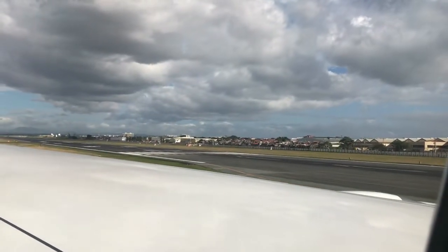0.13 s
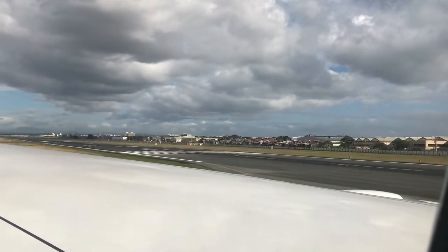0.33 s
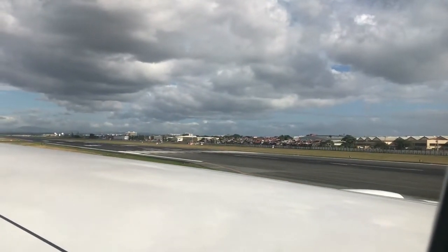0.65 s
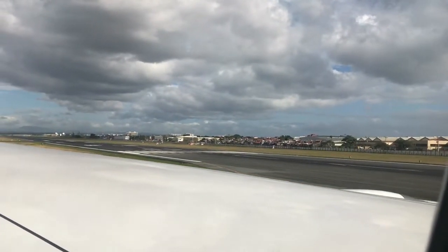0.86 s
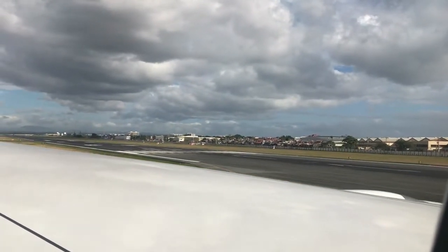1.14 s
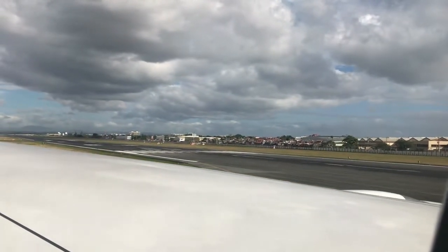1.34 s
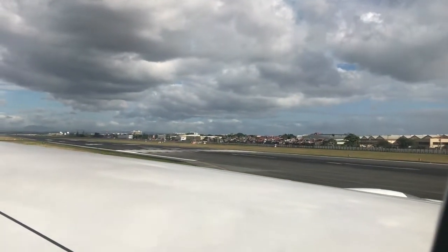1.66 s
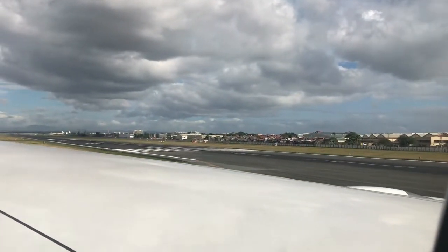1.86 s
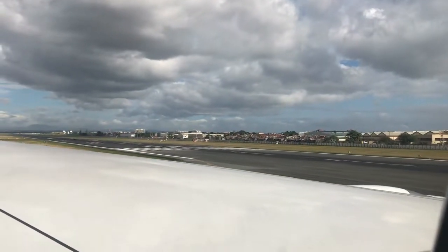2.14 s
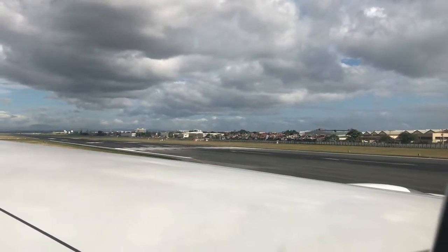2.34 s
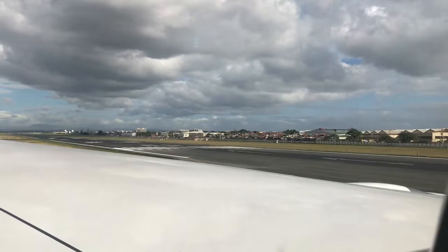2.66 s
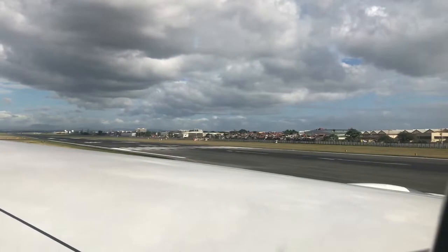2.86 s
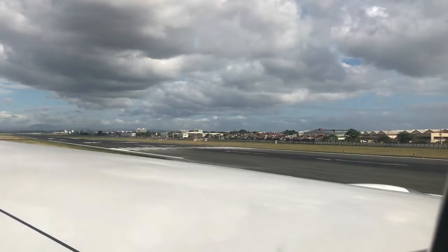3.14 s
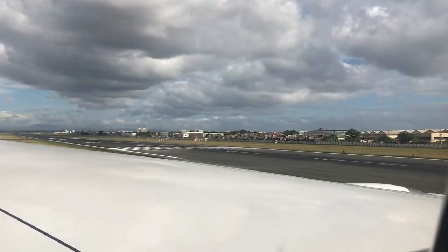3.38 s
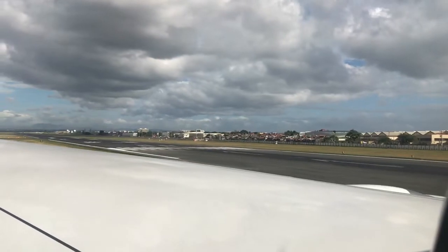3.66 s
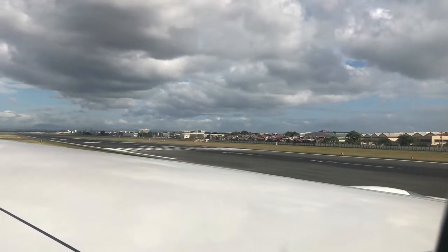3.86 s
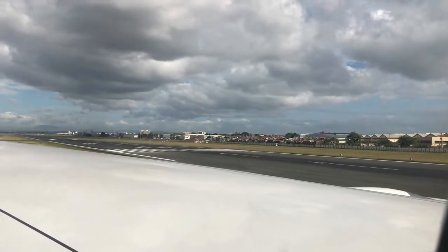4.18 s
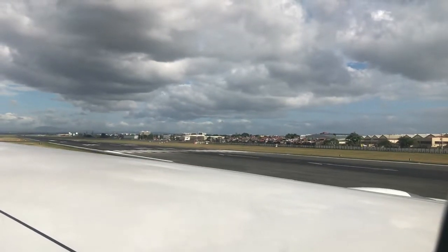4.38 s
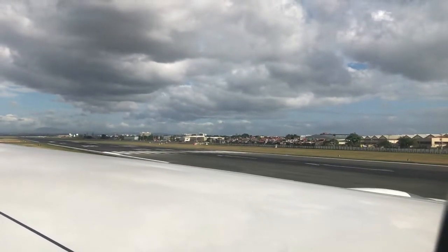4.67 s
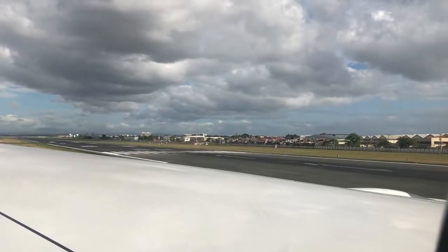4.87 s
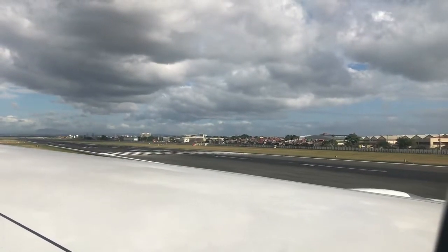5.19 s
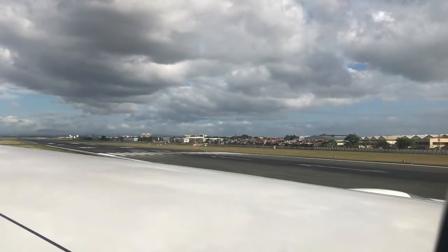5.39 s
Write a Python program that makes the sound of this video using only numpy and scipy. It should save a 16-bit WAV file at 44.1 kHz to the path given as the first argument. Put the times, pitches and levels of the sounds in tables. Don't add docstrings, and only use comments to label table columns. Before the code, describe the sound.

The inside of a jet airliner cabin as it taxis, captured by a handheld phone. From about 0.1 to 0.8 seconds the wheels cross uneven paving joints: rapid, very deep floor booms, strongest near 0.35, 0.55 and 0.66 seconds, with hard plastic rattles around 0.1 and a sharp clack near 0.75. Smaller rattling settles by 1 second. From then on a continuous, muffled low rumble swells gently beneath soft, airy vent hiss. A faint, thin engine whine glides upward slightly, mainly between 1 and 5 seconds, joined by a growing low hum; a second, nearly matching whine makes it beat slowly from about 3.5 seconds. Light trim ticks come sparsely near 1.7, 2.2, 2.4, 3.05, 3.3 and 4 seconds, the ones at 2.4 and 4.0 clearest. The last second is just rumble, hiss and whine, without a fade. The enclosed cabin adds only a very short tail.

```python
import sys
import numpy as np
from scipy import signal
from scipy.fft import rfft, irfft
from scipy.io import wavfile
from scipy.ndimage import uniform_filter1d

SR = 44100
rng = np.random.default_rng(int(sys.argv[2]) if len(sys.argv) > 2 else 0)


def wav_record(signal):
    frames = np.transpose(np.atleast_2d(signal))
    bounded = np.clip(frames, -1, 1)
    quanta = np.round(bounded * 32767).astype(np.int16)
    wavfile.write(sys.argv[1], SR, quanta)


def rack_gain(trim_db):
    fader = np.asarray(trim_db, float)
    return 10 ** (fader / 20)


N = 243431


def curves(table):
    s, *columns = np.transpose(table)
    return [np.interp(np.arange(N) / SR, s, c) for c in columns]


def resonate(x, points, peaks=()):
    hz = np.arange(len(x) // 2 + 1) * SR / len(x) + 1
    point_hz, point_db = np.array(points).T
    db = np.interp(np.log(hz), np.log(point_hz), point_db)
    for centre, width, boost in peaks:
        db = db + boost / (1 + (2 * (hz - centre) / width) ** 2)
    cepstrum = irfft(db * np.log(10) / 20, len(x))
    cepstrum[1:len(x) // 2] *= 2
    cepstrum[len(x) // 2 + 1:] = 0
    return irfft(rfft(x) * np.exp(rfft(cepstrum)), len(x))


def colour(x, points, peaks=()):
    y = resonate(x, points, peaks)
    return y / y.std()


def walk(rate):
    hold = int(SR / rate)
    steps = np.repeat(rng.standard_normal(N // hold + 1), hold)
    return 1.13 * uniform_filter1d(uniform_filter1d(steps, hold), hold)[:N]


def tone(hz, db, turns=0):
    return np.sqrt(2) * rack_gain(db) * np.sin(2 * np.pi * (np.cumsum(hz) / SR + turns))


def add(out, x, s):
    i = int(s * SR)
    out[i:i + len(x)] += x[:N - i]


# frequency in Hz, density in dB per Hz.
RUMBLE_SPECTRUM = [(12, -64.5), (22, -22), (33, -33.5), (40, -2), (60, 1), (91, -0.5), (113, -4), (179, -7),
                   (209, -14.5), (317, -21), (425, -31.5), (527, -38.5), (686, -39), (1040, -74)]
# time in seconds, level in dB.
PAVING = [(0, -31), (.12, -11), (.26, -32), (.35, -18), (.53, -17), (.62, -11.5), (.85, -25), (1.15, -25),
          (1.35, -20.5), (1.7, -32.5), (1.9, -25), (2.3, -29.5), (2.9, -23.5), (3.4, -26.5), (4.1, -26),
          (4.7, -29.5), (5.1, -25), (5.52, -24.5)]
# time in seconds, level in dB.
ROAR = [(0, -27.5), (.35, -28), (.6, -38.5), (.95, -25), (1.35, -28.5), (1.75, -24.5), (2.9, -26),
        (3.5, -27), (4.4, -26), (5.52, -28)]


def hull():
    wheels_db, = curves(PAVING)
    roar_db, = curves(ROAR)
    shake = colour(rng.standard_normal(N), RUMBLE_SPECTRUM)
    wheels = signal.sosfiltfilt(signal.butter(2, 110, fs=SR, output="sos"), shake)
    low = signal.sosfiltfilt(signal.butter(2, 215, fs=SR, output="sos"), shake)
    boom, skin = low - wheels, shake - low
    parts = [(wheels, wheels_db), (skin, -37 + 0.19 * walk(3.3)), (boom, roar_db + 0.26 * walk(7.5))]
    return sum(x / x.std() * rack_gain(db) for x, db in parts)


# start in seconds, peak level in dB, floor resonance in Hz, rise in ms.
JOINTS = [(0.096, -6.5, 76.7, 21), (0.144, -10, 81.4, 17.4), (0.2, -14, 64.3, 33),
          (0.291, -8.5, 99.2, 18.5), (0.346, 0, 66.7, 9.9), (0.384, -11, 80.4, 17.6),
          (0.45, -15.5, 60.5, 22), (0.511, -12, 60, 8.5), (0.553, -2, 66.6, 9.8), (0.589, -11, 89, 13),
          (0.614, -22, 60.5, 15), (0.661, 0, 71.9, 18), (0.727, -11, 76.6, 17.5), (0.753, -21, 74, 10)]


def jolts():
    out, t = np.zeros(N), np.arange(SR // 4) / SR
    crunch = colour(rng.standard_normal(N), [(200, -13.5), (400, 1.5), (1000, -1), (1800, -31.5)])
    for s, db, hz, rise_ms in JOINTS:
        u = t / (rise_ms / 1000)
        swell = (u * np.exp(1 - u)) ** 1.47
        floor = np.sin(2 * np.pi * hz * t)
        panels = rack_gain(-38.5) * crunch[int(s * SR):][:len(t)]
        add(out, rack_gain(db) * swell * (floor + panels), s)
    return out


# time in seconds, near engine in Hz, far engine slower by Hz.
SPOOL = [(0, 900.5, 6.0), (.6, 901.2, 6.0), (1.2, 904.6, 6.0), (2, 911.6, 6.1), (2.8, 918.9, 6.2),
         (3.5, 924.1, 6.0), (3.9, 927.5, 5.3), (4.1, 929, 5.05), (4.6, 932.1, 4.3), (5.1, 935.2, 3.5),
         (5.52, 936.8, 3.1)]
# frequency at idle in Hz, rise while spooling up in Hz.
GEARED = [
    (84.1, 6),
    (493.5, 11),
    (963.9, 43.3),
    (1558.3, 55),
    (9008.7, 0),
]
# level at idle in dB, level spooled up in dB.
GEARED_LEVELS = [(-60, -27), (-80, -61), (-63, -68), (-61.5, -57.5), (-81, -86)]


def engines():
    near_hz, slower_hz = curves(SPOOL)
    spool = (near_hz - near_hz[0]) / 37.5

    def fade(idle, spooled):
        return idle + (spooled - idle) * spool

    joins_s, rise_s, beat_null_s = 3.5, .35, 4.5
    far_db = -53 - 20 * np.log10(1 + np.exp((joins_s - np.arange(N) / SR) / rise_s))
    slip = np.cumsum(slower_hz)[int(beat_null_s * SR)] / SR
    out = tone(near_hz, fade(-49, -53.5) + 1.0 * walk(12))
    out -= tone(near_hz - slower_hz, far_db, slip)
    out += tone(near_hz / 2, fade(-53.5, -59) + 1.6 * walk(6.1))
    for (idle_hz, gain_hz), ends_db in zip(GEARED, GEARED_LEVELS):
        sway_db = 2.5 if idle_hz < 200 else 1.4
        out += fade(*rack_gain(ends_db)) * tone(idle_hz + gain_hz * spool, sway_db * walk(7.9))
    return out


# start in seconds, level in dB, body and brightness in dB over it.
RATTLES = [(.0633, -42, -5, -8), (.0700, -37, -1, -5), (.0737, -31, -2, -10), (.0878, -36, 4, -11),
           (.0974, -37.5, 4, -12), (.1234, -39.5, -0.5, -12), (.152, -50.5, 11, -2), (.3468, -49.5, 6, -10),
           (.3681, -49, -5, -13), (.394, -50.5, 1, -5), (.637, -47, 3, 3), (.6544, -48.5, 7, -1),
           (.6734, -46.5, 7, 1), (.6834, -50, 3, 7), (.6994, -51, 4, 1), (.7488, -25, -2.5, -12.5),
           (.7766, -31, -4, -15), (.7944, -51, 11, -6), (.8186, -47, 4, -6), (.846, -51, -3, -5),
           (.9123, -38, -2.5, -14.5), (.9577, -44, 1, -12), (.9794, -56, 7, 3)]
# start in seconds, level in dB, body and brightness in dB over it.
TICKS = [(1.6916, -46, 3, -8), (1.7215, -48, 5, -17), (2.161, -44, 2, -2), (2.178, -48, 3, -3),
         (2.2833, -61, 10, 6), (2.381, -35.5, 1, -14.5), (2.4342, -49, 2, -8), (2.5247, -52.5, 4, -0.5),
         (3.0395, -45, 1, -14), (3.064, -50, 0, -8), (3.075, -49.5, -4, -7), (3.2046, -54, 5, -10),
         (3.2803, -43.5, -1, -9), (3.293, -44, 1, -26), (3.9464, -55, 8, 4), (3.9974, -52, 3, -3),
         (4.0178, -37, -1, -14), (4.0314, -57, 17, 1), (4.0554, -54, 3, -2), (3.9555, -55, 8, 3)]


def blows():
    return [(s, db, db + body, db + bright, db + bright + top_db)
            for rows, top_db in ((RATTLES, -11.5), (TICKS, -14)) for s, db, body, bright in rows]


# frequency in Hz, width in Hz, boost in dB.
TRIM = [(1500, 110, 11), (1820, 80, 8), (2090, 90, 8), (2410, 120, 4), (2780, 120, 7), (3710, 300, 16),
        (4210, 120, 6), (4830, 150, 3), (5300, 200, 7), (5930, 250, 9), (7300, 250, 8), (8100, 200, 5),
        (9200, 250, 4), (11800, 400, 6), (12700, 300, 5), (14200, 300, 3)]


def rattles():
    out, t = np.zeros(N), np.arange(8192) / SR
    cabin_t60_s, cabin_db = .11, -12
    for s, mid_db, low_db, high_db, top_db in blows():
        buzz_ms = 2.1 + .05 * (mid_db + 53.5)
        place, contact = rng.standard_normal(len(TRIM)), rng.standard_normal((2, len(t)))
        shape = [(1250, low_db - 7), (1450, low_db + 7), (2700, low_db + 5.0),
                 (3300, mid_db - 8.0), (4600, mid_db - 5.5), (5400, high_db + 3.5),
                 (8500, high_db + 1), (10300, top_db), (16000, top_db + 3.5)]
        spot = 1 + .12 * place
        woken = [(hz, 1.44 * width, 1.165 * db * p) for (hz, width, db), p in zip(TRIM, spot)]
        buzz = contact[0] * (1 - np.exp(-t / 0.0007)) * np.exp(-(t / (max(buzz_ms, .5) / 550)) ** 2)
        snap = 2.2 * (t == t[20])
        blow = rfft(buzz + snap)
        power = np.abs(blow) ** 2
        even = np.sqrt(np.mean(power) / uniform_filter1d(power, size=24))
        push = irfft(blow * even) * (t < .05)
        decay = np.exp(-np.log(1000) * t / cabin_t60_s)
        tail = rack_gain(cabin_db) * contact[1] * (1 - np.exp(-t / 0.0051)) * decay
        add(out, resonate(push + tail, shape, woken), s)
    return out


# peak in seconds, level in dB, half length in seconds,
# sizzle in dB over it.
STIRS = [
    (0.092, -52.5, 0.023, -14),
    (0.41, -57, 0.043, -20),
    (0.665, -58, 0.066, -18),
    (0.96, -58.5, 0.08, -7),
    (1.197, -62.5, 0.11, -11),
    (1.65, -64, 0.057, -9),
    (2.68, -64, .1, -8),
    (3.2, -67, 0.1, -9),
    (3.568, -65, .05, -6),
    (4.02, -61, .07, -16),
]


def unrest():
    t = np.arange(N) / SR
    after_db, after_t60_s = -18, 0.26
    after = sum((t > s) * rack_gain(db + after_db - 60 * np.maximum(t - s, 0) / after_t60_s) ** 2
                for s, db, *_ in blows())
    wash = after + rack_gain(-76.5) ** 2
    sizzle = after * rack_gain(-19) ** 2 + rack_gain(-82) ** 2
    for s, db, half_s, sizzle_db in STIRS:
        swell = rack_gain(db) ** 2 * np.exp(-((t - s) / half_s) ** 2)
        wash = wash + swell
        sizzle = sizzle + swell * rack_gain(sizzle_db) ** 2
    return np.sqrt(wash), np.sqrt(sizzle)


def chatter():
    wash_gain, sizzle_gain = unrest()
    size_db = 1.5 * uniform_filter1d(rng.standard_normal((2, N)), size=60) * 60 ** .5
    contacts = rng.standard_normal((2, N)) * rack_gain(size_db)
    shape = [(700, -19.5), (1500, 3.5), (4000, -1.5), (8000, -6), (10500, -11.5), (15000, -8.0)]
    blurred_trim = [(hz, 2 * width, db / 4) for hz, width, db in TRIM]
    wash = colour(contacts[0], shape, blurred_trim)
    sizzle = colour(contacts[1], [(9000, -34.0), (12500, -8.5), (14500, -7.5), (16000, -9.5)])
    return wash * wash_gain + sizzle * sizzle_gain


# frequency in Hz, density in dB per Hz.
HISS_SPECTRUM = [(290, -23), (500, 0.5), (800, -5), (1080, -6.5), (1460, -6.5), (1720, -9.5), (2100, -12),
                 (2850, -17), (3200, -21.5), (4800, -30.5), (6200, -32), (8000, -38), (10600, -37.5),
                 (15900, -40)]
# frequency in Hz, width in Hz, boost in dB.
DUCTS = [(1164, 26, 2.5), (1265, 24, 6.5), (1350, 40, 3.5), (1450, 110, -2.5), (1760, 120, -4),
         (1874, 40, 5), (2050, 81, 4), (2425, 100, 4.5), (2775, 44, 5), (5660, 160, 4.5), (6300, 27, 12),
         (9000, 300, 5.5), (9800, 200, 7), (11800, 500, 5.5), (12700, 300, -3), (14900, 300, 3.5)]


def vents():
    hiss = colour(rng.standard_normal(N), HISS_SPECTRUM, DUCTS)
    nozzle = colour(rng.standard_normal(N),
                    [(10800, -32), (11500, -3), (11800, -0.5), (12100, -7.5), (12800, -26.5)])
    flutter_db = 2.5 * walk(25) + 1.5 * walk(4)
    return hiss * rack_gain(-46.5 + 0.55 * walk(4.7)) + nozzle * rack_gain(-75.0 + flutter_db)


def scene():
    return (hull() + jolts() + engines() + rattles() + chatter() + vents())[None]


def roll_off(x):
    return signal.sosfilt(signal.butter(12, 16090, fs=SR, output="sos"), x)


def record(dry):
    soft = np.tanh(0.55 * dry) / 0.65
    low_pass = signal.ellip(10, .2, 70, 15600, fs=SR, output="sos")
    return roll_off(signal.sosfilt(low_pass, soft))


dry = scene()
out = record(dry)
wav_record(out)
```